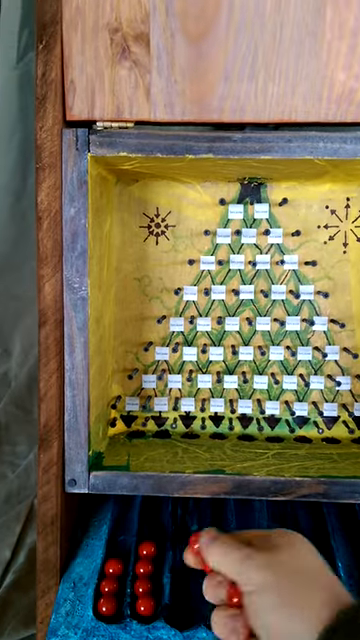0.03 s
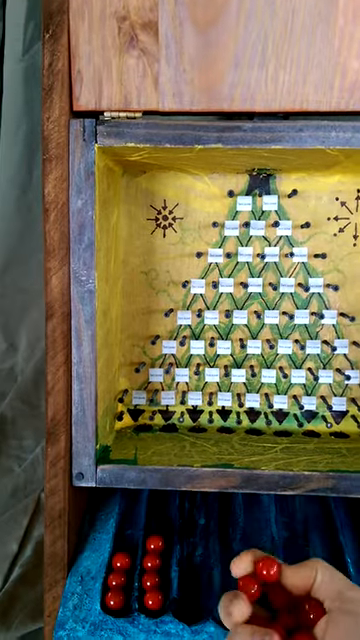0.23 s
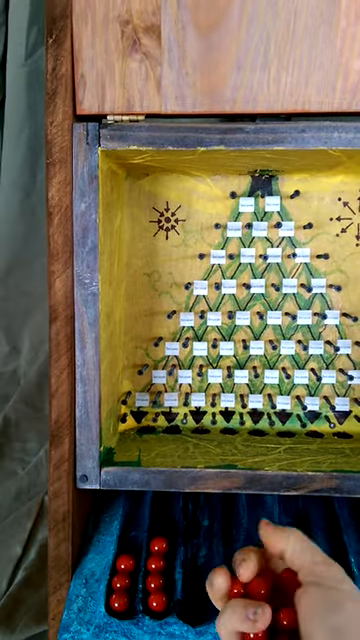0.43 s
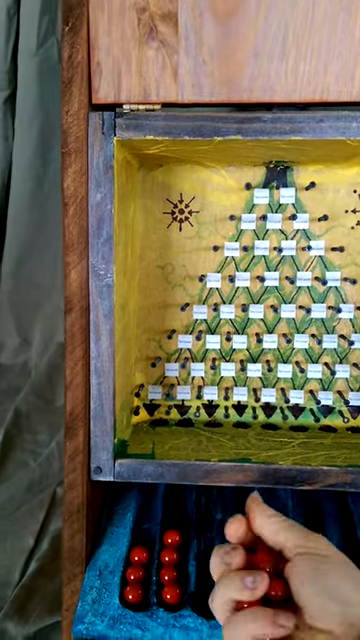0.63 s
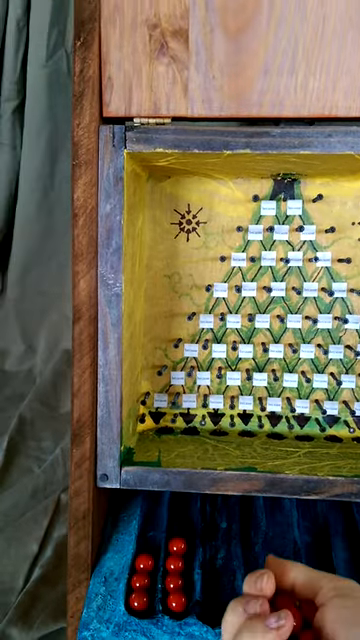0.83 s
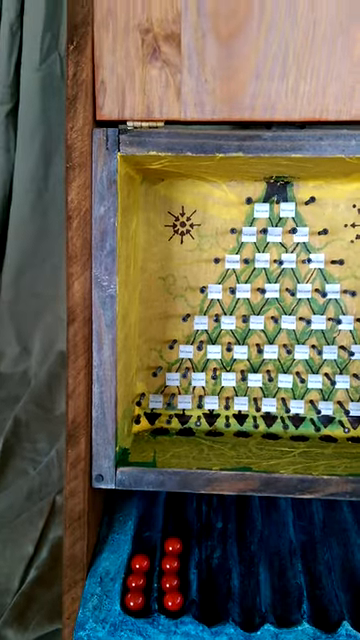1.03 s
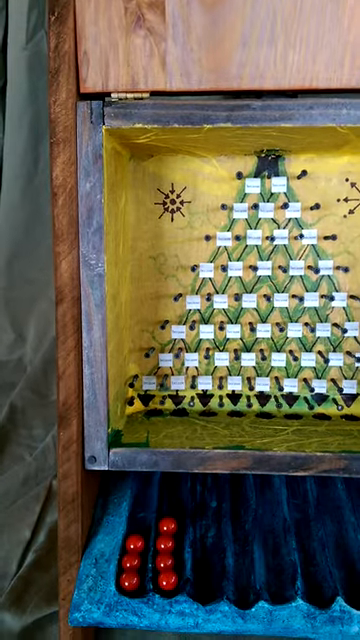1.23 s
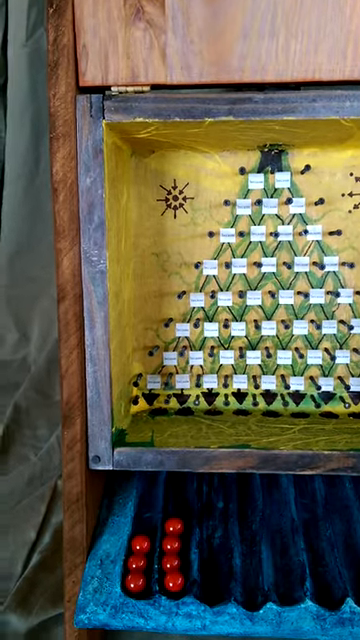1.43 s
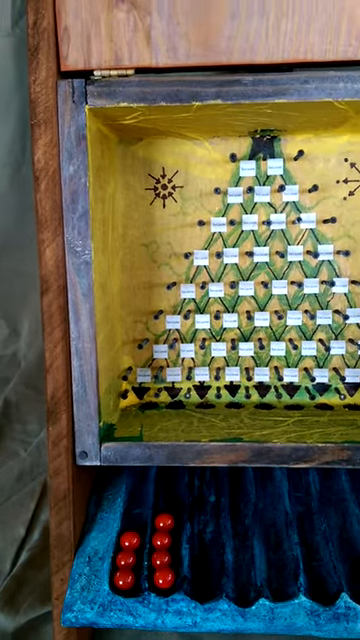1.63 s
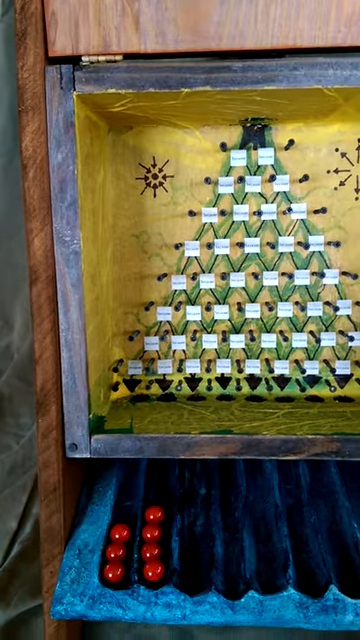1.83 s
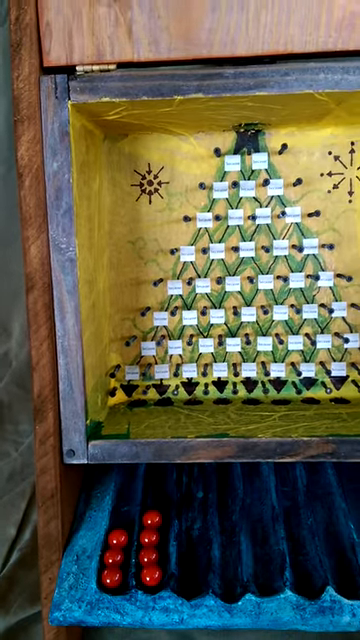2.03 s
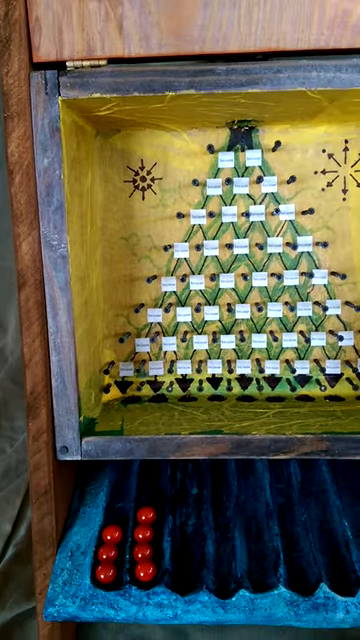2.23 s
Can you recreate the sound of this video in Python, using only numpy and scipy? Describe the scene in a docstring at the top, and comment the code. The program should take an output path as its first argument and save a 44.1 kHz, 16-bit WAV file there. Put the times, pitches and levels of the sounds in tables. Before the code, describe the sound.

Clusters of small hard balls clicking together, some dropping into a tray over faint low thumps.

```python
"""Hard balls and a wooden tray.

A handful of hard balls clicks in clusters near the left microphone, ringing the hollow between them,
then rattles on while some drop and knock into a lined wooden tray.
A dull thump repeats beyond the quiet room, over a low hum and faint hiss."""
import sys
import numpy as np
from scipy import signal
from scipy.fft import rfft, irfft, next_fast_len
from scipy.io import wavfile
from scipy.ndimage import map_coordinates

SR = 44100
rng = np.random.default_rng(int(sys.argv[2]) if len(sys.argv) > 2 else 0)


def to_wav(sig):
    """Store sig (one row per channel, or 1-D mono) as 16-bit WAV at the path in sys.argv[1].

    Samples outside -1..1 are clipped; the rate is SR.
    """
    pcm = np.clip(np.atleast_2d(sig), -1, 1) * 32767
    pcm = np.round(pcm).astype(np.int16)
    wavfile.write(sys.argv[1], SR, pcm.T)  # frames by channels


N = 105840

# hiss spectrum: freq_hz, level_db
HISS_SPECTRUM = [(20, -19), (50, -6.5), (70, -8.5), (141, -13), (530, -22.5), (900, -24.5), (1700, -27),
                 (3800, -29), (7300, -30), (11300, -31), (15000, -34.5), (16500, -53)]
# hiss left-right likeness: freq_hz, correlation
HISS_CORRELATION = [(100, 0.65), (500, 0.067), (2000, 0.11), (10000, 0.064)]
# distant thumps: start_s, level_db
THUMP_HITS = [(0.16, -40.5), (0.595, -38), (1.061, -36.5), (1.513, -35.5), (1.985, -36)]
# thump resonances: settled_hz, level_db, delay_s, rise_s, t60_s, sag_ratio
THUMP_MODES = [(162.2, 17, 0.00072, 0.015, 0.063, 0.016), (101.1, 24, 0.03094, 0.057, 0.12, 0.66),
               (103.5, -14.5, .125, 0.0068, 0.56, 0.072), (136.2, -11.5, 0.062, 0.013, 0.56, 0.12),
               (182.1, -13, 0.12, 0.028, 0.33, 0), (375, -12, 0.0074, 0.005, 0.23, 0.024),
               (294, -13, .035, 0.0068, 0.3, 0.036)]
# unpitched part of a thump: freq_hz, level_db
PUFF_SPECTRUM = [(60, -19), (150, -7), (330, -7.5), (550, -13.5), (900, -26), (2000, -25), (6000, -40)]
# ball on ball (the row at 2.0188 s is instead the bright ring of the tray knock there): start_s, level_db,
# ring_hz, hollow_hz, hollow_db
BALL_HITS = [(0.167, -20, 8000, 3960, -9), (0.2085, -4.5, 8450, 3170, -14.5),
             (0.2482, 5.5, 8600, 2930, -31), (0.2576, -14, 9100, 3100, -26.5),
             (0.2601, -0.0, 10600, 3130, -22), (0.2679, -7, 11000, 2840, -15),
             (0.275, -15.5, 10500, 3100, -4), (0.281, -14, 8850, 2320, -8.5),
             (0.291, -10.5, 10000, 2750, -11), (0.2993, -10, 8340, 2840, -13.5),
             (0.3286, -15.5, 9500, 2580, -6), (0.3387, -9.5, 7600.0, 2480.0, -14),
             (0.3533, 6, 8100, 4600, -25.5), (0.36, -2.5, 7250, 2620.0, -33),
             (0.3641, 0, 7760, 2720, -22.5), (0.3709, -8.5, 7300, 2660, -14),
             (0.4736, 6.5, 11800, 3080, -25), (0.4811, -4, 7640, 2880, -16), (0.487, -6.5, 7000, 2760, -15),
             (0.5083, 0, 7840, 2930.0, -13.5), (0.5146, 2.5, 9800, 3050, -19),
             (0.5212, -4, 9100, 3200, -6.5), (0.519, -1, 7400, 3350, -7), (0.528, 6.5, 10600, 3160, -15),
             (0.532, 4, 10500, 3200, -8), (0.5366, 2, 10500, 2900, -10.5), (0.5392, -12, 7440, 2050, -14),
             (0.5422, 5.5, 7500, 3160, -13.5), (0.5467, 1.5, 8450, 2130, -16), (0.552, -2, 9100, 3100, -4),
             (0.5604, -0.5, 7400, 3120, -12), (0.5758, -1.5, 9800, 3460, -9),
             (0.5823, -6, 8500.0, 3300, -4), (0.5889, 0.5, 9300, 3530, -11.5), (0.59, -2, 8750, 3350, -4.5),
             (0.639, -17.5, 6800, 3150, -9.5), (0.6804, -2.5, 8400, 2740, -9.5),
             (0.7117, -15.5, 7650, 2960, 2), (0.7229, -1.5, 7200, 3020, -15.5),
             (0.7232, -3, 9500, 2760, -12), (0.7308, -1.5, 10400, 2730, -10), (0.7406, -9, 7100, 2670, -7),
             (0.7444, -13.5, 9900, 2720, -1.5), (0.7545, -5, 11200, 2640, -12),
             (0.7683, -12.5, 9900, 3220, -10), (0.7798, 0, 6260, 3090, -9), (0.7822, -6, 5750, 4560, -7),
             (0.795, -11.5, 7200, 4700, 2), (0.8087, -15, 10600, 4930, -12), (0.82, -16.5, 6550, 4360, -1),
             (0.8354, -17.5, 7600.0, 4130, 3.5), (0.882, -11.5, 11000, 3020, -14.5),
             (0.9051, -4, 9000, 4400, -0.5), (0.914, -4, 6700, 2660, -4), (0.966, -37, 8500, 4700, 0.5),
             (0.9837, -4, 8750, 4500, -9), (0.9876, -4, 9400, 2390, -6.5), (1.016, -7.5, 8700, 3240, -6.5),
             (1.0234, 1.5, 9200, 4260, -16.5), (1.0276, -3, 9500, 2510, -6.5),
             (1.0374, -6.0, 8200, 2720, 1), (1.059, -19, 7000, 2500, 3.5), (1.1107, -9.5, 7000, 2615, -1),
             (1.1317, -8.5, 9700, 2590, 0.5), (1.1968, -18.5, 7500, 2400, -17),
             (1.4629, -18, 6700, 1940, 0.5), (1.4709, -21.5, 6400, 1950, 1.5),
             (1.5275, -16.5, 9000, 5150, -6), (1.584, -5.5, 9800, 2440, -25.5),
             (1.6048, -18, 9500, 4770, -2.5), (1.6371, -13, 7100, 2360, -28),
             (1.6397, -15, 8500, 5500, -8.5), (1.656, -19.5, 7700, 5500, -6.5),
             (1.6836, -6, 9400, 5700, -18), (1.6934, -7, 9100, 5400, -15.5),
             (1.7266, -10.5, 7850, 2400.0, -11.5), (1.7612, -10, 10200, 5230, -11),
             (1.772, -17, 9900.0, 2790.0, -12), (1.7777, -10.5, 10300, 2530.0, -18),
             (1.7882, -9, 10000, 2280, -12), (1.8003, -5.5, 10300, 6500, -16.5),
             (1.8096, -4.5, 11200, 2440, -19), (1.8255, -6.5, 11000, 6400, -22),
             (1.8355, -6.5, 11000, 5360, -21), (1.856, -20, 10100, 2590, -14),
             (1.8698, -13.5, 10500, 2350, -16), (1.8946, -20, 10100, 2300.0, -30),
             (1.9033, -17.5, 8200, 2480.0, -12), (1.964, -23, 9600, 4500, -18),
             (1.9845, -22.5, 9100, 2700.0, -23), (2.0188, -15.5, 5750, 2540, 11.5),
             (2.045, -26, 10500, 2500, -14), (2.113, -29, 9800, 2500, -11), (2.1393, -5, 10400, 2595, -11),
             (2.185, -21.5, 9500, 2300.0, -12), (2.2083, -12.5, 10360, 2680, -19.5)]
# base click spectrum: freq_hz, level_db
CLICK_SPECTRUM = [(200, -52), (900, -25.5), (1400, -27.5), (1900, -16), (2400, -11.5), (4000, -7),
                  (7000, -2), (10500, -2.5), (13000, -9), (15000, -23), (16500, -41)]
# added to clicks over the tray: freq_hz, gain_db
OVER_TRAY_EQ = [(2400, 3), (3500, -1.5), (5700, 2), (7200, -0.5), (10300, 1), (12500, 1.5)]
# lift of a click's lower band with depth in the handful: freq_hz, weight
DEPTH_SHELF = [(4300, 0.76), (7000, 0.0468)]
# shadowing at the right microphone: freq_hz, gain_db
RIGHT_SHADOW = [(500, -7.5), (1500, -3.5), (2700, -4), (4000, -10), (7000, -19.5), (10000, -17),
                (13000, -7.5), (16000, 4)]
# room decay: freq_hz, t60_s
ROOM_DECAY = [(200, 0.33), (1500, 0.32), (5000, 0.23), (10000, 0.22), (15000, 0.19)]
# ball on tray: start_s, level_db, tilt_db_per_octave
TRAY_HITS = [(1.456, -44.5, -4.5), (1.581, -30, -4), (1.634, -30.5, -2.5), (1.688, -22.5, -2),
             (1.717, -22, -1), (1.763, -30.5, -4), (1.782, -25, -2.5), (1.803, -36, -3.5),
             (1.826, -29, -2.5), (1.838, -26.5, -2.5), (1.850, -25.5, -2), (1.860, -26.5, -2),
             (1.894, -46, -5), (1.961, -28, -3.5), (2.018, -19, 0.5), (2.075, -29, -3.5),
             (2.109, -37.5, -6), (2.141, -22.5, -2), (2.161, -24.5, -3), (2.188, -29.5, -6.5),
             (2.215, -39, -8.5), (2.345, -46, -7)]
# knock spectrum: freq_hz, level_db
TRAY_SPECTRUM = [(90, -33), (185, 0), (270, 3), (400, -2.5), (480, -13), (560, -3.5), (680, -9), (950, -13),
                 (1150, -6.5), (1600, -5), (1900, -5.5), (2300, -11), (2520, -8.5), (2900, -16.5),
                 (3600, -14.5), (6000, -36), (12000, -47)]
# tray resonances: pitch_hz, level_db, t60_s
WOOD_MODES = [(266, -44, 0.094), (558.4, -28.5, 0.07), (1593, -19.5, 0.019), (2564, -42, 0.015)]
# tray stereo width, bass near mono: freq_hz, side_db
TRAY_SIDE = [(200, -19.5), (600, -1.5), (2000, -4.5)]
# tray balance: freq_hz, left_minus_right_db
TRAY_BALANCE = [(150, -2), (400, -3), (570, -10.5), (800, 1), (1200, -0.5), (1750, -7.5), (2500, -2.5),
                (4000, 2)]

HISS_DB, HUM_HZ, HUM_DB = -65.5, 49.4, -67.5
SAG_S, PUFF_DB, PUFF_T60_S = 0.02, -14.5, 0.5
CLICK_DB, OVER_TRAY_FROM_S = -0.5, 1.3
RING_DB, RING_OCT = 8.5, 0.32
HOLLOW_DB, HOLLOW_TAIL_DB, HOLLOW_OCT, HOLLOW_TYPICAL_DB = 7.5, 8, 0.08, -13.5
SHELF_PER_DEPTH, SCATTER_PER_DEPTH = 0.84, 0.69
SMEAR_S, PALM_GAIN, PALM_LAG_S = 0.00039, 0.24, 0.0005
OPEN_SCATTER_DB, RIGHT_SCATTER_DB, SCATTER_T60_S = -4.5, 27.5, 0.019
PING_DB, PING_T60_S, PING_REF_HZ = -31.5, 0.028, 2600
CHATTER_DB, CHATTER_GAP_S, CHATTER_LOSS_DB = -19, 0.0073, 8.5
GLASSY_DB, GLASSY_HZ, GLASSY_OCT = 3.5, 9570, 0.28
HAND_ROOM_DB, OVER_TRAY_ROOM_DB, RIGHT_ROOM_DB, KNOCK_ROOM_DB = -19, -11.5, -5, -9
KNOCK_DB, TRAY_RING_DB, SPOT_OCT = 14, 3, 0.033
KNOCK_SCATTER_DB, KNOCK_T60_S, KNOCK_LAG_S = 2, 0.024, 0.00008
TOP_HZ = 16600


def amp(db):
    """Decibels to gain."""
    return 10 ** (np.asarray(db) / 20)


def unit(x):
    """Scale to rms 1."""
    return x / np.sqrt(np.mean(x ** 2) + 1e-20)


def along(points, hz):
    """Interpolate (freq_hz, value) points on a log axis."""
    freqs_hz, values = np.transpose(points)
    return np.interp(np.log(hz + 1), np.log(freqs_hz + 1), values)


def bump(hz, centre_hz, octaves):
    """Resonance shape, 1 at its centre."""
    return 1 / (1 + (np.log2(hz / centre_hz) / octaves) ** 2)


def add(track, start_s, sound):
    """Mix a sound in at start_s."""
    i = round(start_s * SR)
    track[:, i:i + sound.shape[-1]] += sound[..., :max(N - i, 0)]


def filtered(x, response):
    """Apply a frequency response."""
    n = x.shape[-1]
    size = next_fast_len(2 * n)
    return irfft(rfft(x, size) * response(np.fft.rfftfreq(size, 1 / SR)), size)[..., :n]


def impulse(spectrum_db, size=2048):
    """Minimum-phase impulse of a given spectrum, energy 1."""
    cepstrum = irfft(np.log(amp(spectrum_db(np.fft.rfftfreq(size, 1 / SR) + 1))))
    cepstrum[1:size // 2] *= 2
    cepstrum[size // 2 + 1:] = 0
    pulse = irfft(np.exp(rfft(cepstrum)))
    return pulse / np.linalg.norm(pulse)


def hiss():
    """Room hiss, partly correlated in the bass."""
    hz = np.fft.rfftfreq(N, 1 / SR)
    width_rad = np.arccos(along(HISS_CORRELATION, hz)) / 2
    spectrum = rfft(rng.standard_normal((2, N))) * amp(along(HISS_SPECTRUM, hz))
    mid, side = irfft(spectrum * [np.cos(width_rad), np.sin(width_rad)], N)
    return amp(HISS_DB) * unit(np.array([mid + side, mid - side]))


def hum():
    """Low sine, wavering in level."""
    waver_db = 0.66 * map_coordinates(rng.standard_normal(size=24), [np.linspace(0, 20, N)])
    return amp(HUM_DB + waver_db) * unit(np.sin(2 * np.pi * HUM_HZ * np.arange(N) / SR))


def thumps():
    """Distant boom: staggered resonances sag in pitch over a puff of low noise."""
    out, t = np.zeros((2, N)), np.arange(SR * 2 // 3) / SR
    boom = np.zeros(len(t))
    for hz, db, delay_s, rise_s, t60_s, sag in THUMP_MODES:
        age_s = np.maximum(t - delay_s, 0)
        cycles = hz * (age_s + sag * SAG_S * (1 - np.exp(-age_s / SAG_S)))
        envelope = amp(db - 60 * age_s / t60_s) * (1 - np.exp(-(age_s / rise_s) ** 2))
        boom -= envelope * np.sin(2 * np.pi * cycles)
    puff_envelope = amp(PUFF_DB - 60 * t / PUFF_T60_S) * (1 - np.exp(-t / 0.034))
    for start_s, db in THUMP_HITS:
        puff = unit(filtered(rng.standard_normal(len(t)), lambda hz: amp(along(PUFF_SPECTRUM, hz))))
        add(out, start_s, amp(db) * (boom + puff * puff_envelope))
    return out * unit(amp([[-1], [1]]))  # slightly right


def snap(spectrum_db):
    """Ball contact: a few cycles, treble trailing bass, plus one palm reflection."""
    pulse = filtered(impulse(spectrum_db), lambda hz: np.exp(-1j * np.pi * SMEAR_S * hz ** 2 / TOP_HZ))
    lag_s = PALM_LAG_S * rng.uniform(0.51, 1.495)
    return filtered(pulse, lambda hz: 1 + PALM_GAIN * np.exp(-2j * np.pi * hz * lag_s))


def scatter(sound, scatter_db, t60_s, size=2048):
    """Direct sound plus dense echoes off balls, hand and tray, per microphone."""
    t = np.arange(size) / SR
    echoes = rng.standard_normal((2, size)) * amp(-60 * t / t60_s) * (t > 0.0004)
    paths = amp(scatter_db) * echoes / np.linalg.norm(echoes, axis=1, keepdims=True)
    paths[:, 0] = 1
    paths /= np.linalg.norm(paths, axis=1, keepdims=True)
    return signal.fftconvolve(sound[None], paths, axes=1)


def ring(pitch_hz, level_db, t60_s, size):
    """One decaying resonance."""
    t = np.arange(size) / SR
    return amp(level_db - 60 * t / t60_s) * np.sin(2 * np.pi * pitch_hz * t)


def room(sound):
    """Fresh stereo room tail; treble dies first."""
    hz, t, noise = signal.stft(rng.standard_normal((2, SR // 3)), SR, nperseg=256)
    envelope = amp(-60 * t / along(ROOM_DECAY, hz)[:, None]) * (1 - np.exp(-t / 0.0095))
    tail = signal.istft(noise * envelope, SR, nperseg=256)[1]
    return signal.fftconvolve(sound[None], tail / np.linalg.norm(tail[0]), axes=1)


def ball_clicks():
    """Each collision snaps, rings a hollow and jostles neighbours; wetter over the tray."""
    out = np.zeros((2, N))
    for start_s, db, ring_hz, hollow_hz, hollow_db in BALL_HITS:
        depth_db = hollow_db - HOLLOW_TYPICAL_DB  # higher deep in the handful
        over_tray = start_s > OVER_TRAY_FROM_S

        def base_db(hz):
            shelf_db = SHELF_PER_DEPTH * depth_db * along(DEPTH_SHELF, hz)
            return along(CLICK_SPECTRUM, hz) + over_tray * along(OVER_TRAY_EQ, hz) + shelf_db

        def snap_db(hz):
            ring_db = RING_DB * bump(hz, ring_hz, RING_OCT)
            return base_db(hz) + ring_db + HOLLOW_DB * bump(hz, hollow_hz, HOLLOW_OCT)

        def tail_db(hz):
            glassy_db = GLASSY_DB * bump(hz, GLASSY_HZ, GLASSY_OCT)
            return base_db(hz) + glassy_db + HOLLOW_TAIL_DB * bump(hz, hollow_hz, HOLLOW_OCT)

        direct = amp(db + CLICK_DB) * snap(snap_db)
        left_scatter_db = SCATTER_PER_DEPTH * depth_db + over_tray * OPEN_SCATTER_DB
        click = scatter(direct, [[left_scatter_db], [RIGHT_SCATTER_DB]], SCATTER_T60_S)
        click[1] = filtered(click[1], lambda hz: amp(along(RIGHT_SHADOW, hz)))
        add(out, start_s, click)
        ping_t60_s = PING_T60_S * (PING_REF_HZ / hollow_hz) ** 2  # smaller gaps die sooner
        add(out, start_s, ring(hollow_hz, db + hollow_db + PING_DB, ping_t60_s, click.shape[1]))
        for k, lag_s in enumerate(np.cumsum(CHATTER_GAP_S * rng.uniform(0.2, 1.5, size=3))):
            jostle_db = CHATTER_DB - CHATTER_LOSS_DB * k + rng.normal(0, 2.6)
            add(out, start_s + lag_s, amp(jostle_db) * click)
        room_db = OVER_TRAY_ROOM_DB if over_tray else HAND_ROOM_DB
        tail = amp(db + CLICK_DB + room_db) * room(impulse(tail_db))
        add(out, start_s, tail * amp([[0], [RIGHT_ROOM_DB]]))
    return out


def tray_knocks():
    """Balls land in the tray, slightly right: short knocks excite wood modes and the room."""
    out = np.zeros((2, N))
    for start_s, db, tilt_db_per_oct in TRAY_HITS:
        detune = 2 ** (SPOT_OCT * rng.standard_normal())  # pitch varies with the spot struck
        tilt_db = lambda hz: tilt_db_per_oct * np.log2(hz / 1000)
        knock = amp(db + KNOCK_DB) * impulse(lambda hz: along(TRAY_SPECTRUM, hz / detune) + tilt_db(hz))
        add(out, start_s, scatter(knock, KNOCK_SCATTER_DB, KNOCK_T60_S))
        for mode_hz, mode_db, t60_s in WOOD_MODES:
            level_db = db + TRAY_RING_DB + mode_db + tilt_db(mode_hz) + rng.normal(0, 1.6)
            add(out, start_s, ring(mode_hz * detune, level_db, t60_s, SR // 8))
        add(out, start_s, amp(KNOCK_ROOM_DB) * room(knock))
    mid = out.mean(axis=0)
    narrowed = mid + filtered(out - mid, lambda hz: amp(along(TRAY_SIDE, hz)))
    split = np.array([[0.5], [-0.5]])
    balance = lambda hz: amp(split * along(TRAY_BALANCE, hz))
    return filtered(narrowed, lambda hz: balance(hz) * np.exp(-2j * np.pi * hz * split * KNOCK_LAG_S))


def scene():
    """Stereo sum of all sources."""
    return ball_clicks() + tray_knocks() + thumps() + hiss() + hum()


def record(dry):
    """Brick-wall low-pass at TOP_HZ."""
    size = next_fast_len(N + SR // 2)
    passband = np.fft.rfftfreq(size, 1 / SR) < TOP_HZ
    return irfft(rfft(dry, size) * passband, size)[:, :N]


dry = scene()
out = record(dry)
to_wav(out)
```